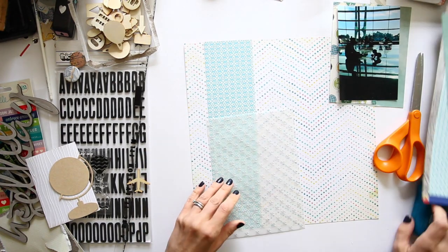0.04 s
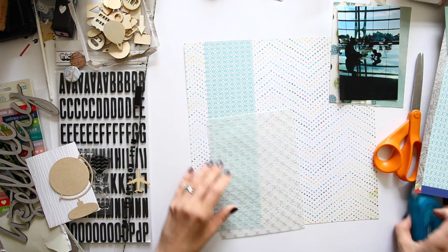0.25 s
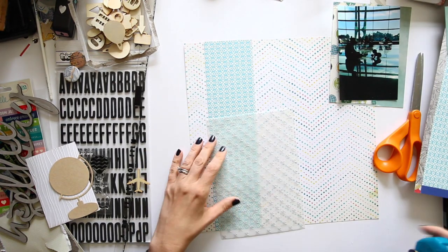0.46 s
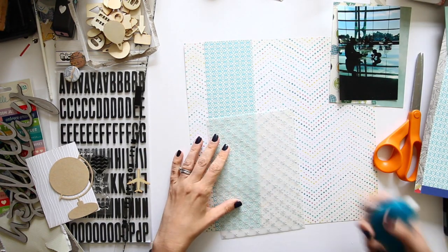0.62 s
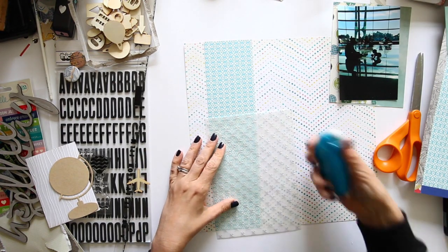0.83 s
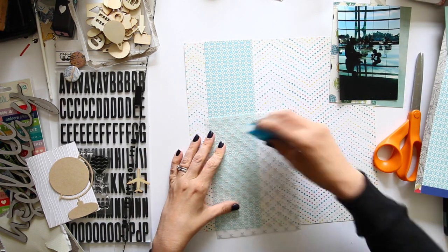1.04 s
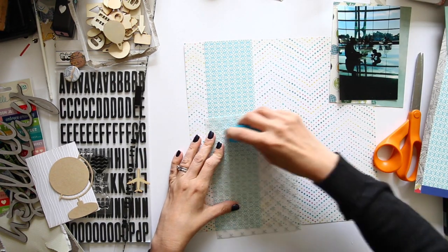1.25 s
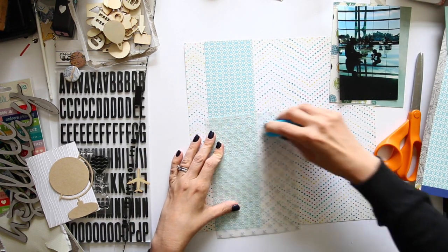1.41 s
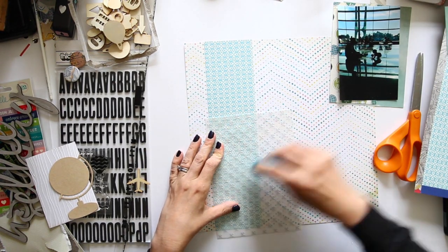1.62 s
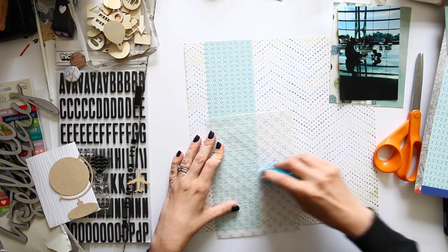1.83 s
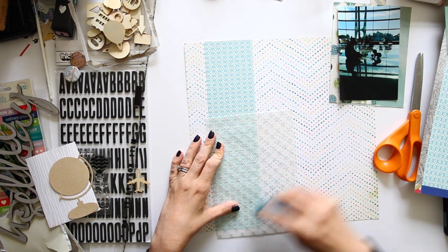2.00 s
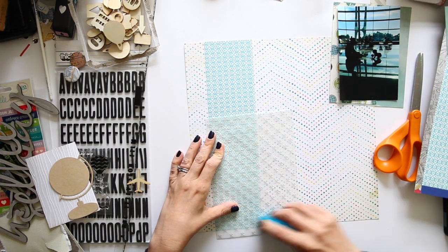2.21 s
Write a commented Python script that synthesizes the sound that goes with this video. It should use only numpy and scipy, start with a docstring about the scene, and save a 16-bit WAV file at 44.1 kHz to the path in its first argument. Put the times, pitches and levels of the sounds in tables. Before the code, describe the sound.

A hand-held glue-tape roller makes three fast, ratcheting rasps on paper, after soft hand rustles, a brief sheet drag and a hard plastic clack; close microphone, small dry room, faint hum and hiss.

```python
"""Glue-tape roller at a craft table

Hands and paper rustle, a sheet is dragged, then a hand-held roller is set down and drawn along paper three times.
Its ratchet ticks once per tooth (shaped noise bursts), faster in mid-stroke, and sticky tape snaps as random grains.
Knocks ring the modes of the hollow plastic shell, and soft pushes thud in the modes of the table.
A small dry room adds a short noise tail to the roller; a quiet hum and hiss of coloured noise lies under it all.
"""
import sys
import numpy as np
from scipy import signal
from scipy.fft import rfft, irfft
from scipy.io import wavfile

SR = 44100
rng = np.random.default_rng(int(sys.argv[2]) if len(sys.argv) > 2 else 0)


def put_to_file(sound):
    """Save the sound as 16-bit audio at rate SR, in the file named by the first command-line argument."""
    columns = np.atleast_2d(sound).T  # one column per channel
    safe = np.clip(columns, -1, 1)
    whole_steps = np.round(safe * 32767)
    wavfile.write(sys.argv[1], SR, whole_steps.astype(np.int16))


N = 99710

# Ringing modes of the hollow plastic shell. Each row: pitch in Hz, relative level in dB, T60 in s.
SHELL_MODES = [(778, -27, 0.064), (896, -4, 0.018), (1014, 5, 0.013), (1190, -6, 0.0088),
               (1370, -2.5, 0.017), (1518, 2, 0.015), (1765, 2.5, 0.011), (1870, -1, 0.022),
               (2065, -8, 0.057), (2570, -2.5, 0.0067), (3084, 1.5, 0.02), (4160, 5.5, 0.0068),
               (4900, 4.5, 0.0084)]
# Ringing modes of the table top. Each row: pitch in Hz, relative level in dB, T60 in s.
TABLE_MODES = [(133, -10, 0.08), (209.5, -7.5, 0.13), (251, -4, 0.065), (329, 0.5, 0.025), (394, -1, .04),
               (500, -24, 0.014)]
# Bright colour of cracking hard plastic, also worn by the tape. Each row: frequency in Hz, relative dB per Hz.
CRACK_COLOUR = [(1000, -22), (2500, -14), (3200, -6.5), (4200, -10), (6000, -5), (7500, -3), (8800, -5.5),
                (10500, -7.5), (13000, -14.5), (16000, -14)]


def amp(db):
    """Turn dB into a linear gain."""
    return 10 ** (np.asarray(db) / 20)


def rms_one(x):
    """Scale x to an rms of 1."""
    return x / np.sqrt(np.mean(x ** 2) + 1e-20)


def level(rows):
    """Draw a gain curve through (s, dB) rows, silent outside them."""
    s, db = np.transpose(rows)
    return amp(np.interp(np.arange(N) / SR, s, db, left=-150, right=-150))


def high_pass(x, hz):
    """Thin out everything below hz."""
    return signal.sosfilt(signal.butter(2, hz, "high", fs=SR, output="sos"), x)


def grains(per_s, spread_db):
    """Scatter tiny random snaps of uneven size."""
    happens = rng.random(N) < per_s / SR
    size = amp(spread_db * np.minimum(rng.exponential(1, N), 4))
    return happens * size * rng.standard_normal(N)


def coloured(x, spectrum):
    """Shape x with a spectrum of (Hz, dB) rows and bring it to an rms of 1."""
    hz, db = np.transpose(spectrum)
    f = np.maximum(np.arange(N // 2 + 1) * SR / N, 1)
    gain = amp(np.interp(np.log(f), np.log(hz), db))
    return rms_one(irfft(rfft(x) * gain, N))


def ring(x, hz, t60):
    """Excite one decaying mode, a two-pole resonator that is deaf to slow pushes."""
    r = amp(-60 / (t60 * SR))
    w = 2 * np.pi * hz / SR
    return signal.lfilter([1, 0, -1], [1, -2 * r * np.cos(w), r * r], x + 1e-18)


def ringing_body(x, modes):
    """Feed a steady sound through all the modes of a body; rms 1."""
    return rms_one(sum(amp(db) * rms_one(ring(x, hz, t60)) for hz, db, t60 in modes))


def bursts(count, t60):
    """Make short dying noise bursts, one a row."""
    return rng.standard_normal((count, 4096)) * amp(-60 * np.arange(4096) / SR / t60)


def lay(s, db, rows):
    """Place each row at its time, scaled to its peak level."""
    rows = rows * (amp(db) / np.abs(rows).max(axis=1))[:, None]
    out = np.zeros(N + SR)
    np.add.at(out, (s * SR).astype(int)[:, None] + np.arange(rows.shape[1]), rows)
    return out[:N]


def strike(touch, modes, spot_hz):
    """Let each blow drive the modes unevenly, most those near the pitch of the spot it hits."""
    mode_scatter_db, spot_db_per_octave, spot_floor_db = 3, 26, -14
    scatter = mode_scatter_db * rng.standard_normal((len(touch), len(modes)))
    out = 0
    for k, (hz, db, t60) in enumerate(modes):
        rung = ring(touch, hz, t60)
        octaves_off = np.abs(np.log2(hz / spot_hz))
        reach_db = np.maximum(-spot_db_per_octave * octaves_off, spot_floor_db)
        gain = amp(db + scatter[:, k] + reach_db) / np.abs(rung).max(axis=1)
        out = out + rung * gain[:, None]
    return out


def cracks(tilt_db, t60, rise_s, boost_db, boost_hz):
    """Make bright dying noise bursts of hard plastic, each favouring some parts of the colour."""
    patchy_db, tilt_from_hz, boost_width_octaves = 2.5, 6600, 0.18
    hz, db = np.transpose(CRACK_COLOUR)
    log_f = np.log(np.arange(1, 2050) * SR / 4096)
    patches = patchy_db * rng.standard_normal((len(tilt_db), len(hz)))
    patches = patches + tilt_db[:, None] * np.maximum(np.log2(hz / tilt_from_hz), 0)
    octaves_off = (log_f - np.log(boost_hz)[:, None]) / np.log(2)
    bump = boost_db * np.exp(-.5 * (octaves_off / boost_width_octaves) ** 2)
    colour = amp([np.interp(log_f, np.log(hz), db + p) for p in patches] + bump)
    t = np.arange(4096) / SR
    noise = irfft(rfft(rng.standard_normal((len(tilt_db), 4096))) * colour)
    return noise * amp(-60 * t / t60) * (1 - np.exp(-t / rise_s))


def hum_and_hiss():
    """Steady noise under the scene, its low end swollen into a hum."""
    # Each row: frequency in Hz, relative dB per Hz.
    floor_colour = [(12, -48), (20, 5), (74, -7.5), (142, 1), (357, -11), (399, -13.5), (678, -13),
                    (825, -11), (1000, -16), (1440, -14), (8650, -16), (11800, -20.5), (16000, -24)]
    floor_db = -62.5  # rms
    return amp(floor_db) * coloured(rng.standard_normal(N), floor_colour)


def rustle():
    """Skin and paper slide: dense fine friction grains that swell and fade."""
    # Each row: time in seconds, level in dB.
    rustle_level = [(0, -41), (.12, -45), (.208, -57), (.224, -49.5), (.278, -39.5), (.308, -45),
                    (.336, -37.5), (.396, -50), (.454, -52), (.494, -64.5), (.55, -65), (.575, -56),
                    (.595, -53.5), (.612, -59.5), (.65, -49.5), (.695, -55.5), (.712, -62), (.79, -58.5),
                    (.85, -54), (.885, -50), (.905, -51), (.92, -59), (.98, -57.5), (1.008, -49.5),
                    (1.03, -50), (1.055, -50), (1.075, -60), (1.1, -67), (1.14, -73)]
    # Each row: frequency in Hz, relative dB per Hz.
    rustle_colour = [(240, -36), (400, -9.5), (562, -17), (964, -8), (1110, -14), (2840, -6), (3210, -5),
                     (3810, -5), (7400, -1), (16000, -26.5)]
    return level(rustle_level) * coloured(grains(25000, spread_db=0.7), rustle_colour)


def knocks():
    """Shell ring and crack of each knock; the soft contact builds up briefly and chatters."""
    # Handling, landing and loose parts rattling. Each row: start in seconds, peak of the ring in dB,
    # peak of the crack in dB, tilt of the crack's top in dB per octave, most excited pitch in Hz.
    knock_rows = [(0.039, -28.5, -37, -1, 870), (0.054, -25, -36, -6, 1750),
                  (0.187, -33.5, -43.5, -15.5, 880), (0.5035, -40, -32.5, -23, 1860),
                  (0.593, -63, -41, -26, 3210), (0.778, -61, -40.5, 2, 3150), (0.785, -64, -39.5, 12, 2610),
                  (0.901, -38, -32.5, -7, 2030), (0.981, -42.5, -54, -13, 1970),
                  (1.005, -41.5, -32, -18, 2070), (1.051, -45.5, -39, 4, 2020), (1.073, -56, -43, -3, 2130),
                  (1.149, -34.5, -62, -21, 840), (1.181, -47, -58, -10, 1940), (1.196, -50, -63, -1, 1070),
                  (1.222, -35, -37, -20, 1980), (1.2246, -22, -12, -12, 1970),
                  (1.229, -22.5, -27, -17, 1950), (1.235, -31, -6, -7, 1930), (1.2357, -14, -10, -2, 1930),
                  (1.243, -24, -34, -8, 1800), (1.2868, -21, -35, -10, 940), (1.302, -54, -33, -10, 1310),
                  (1.3057, -16, -39, -4, 1270), (1.321, -22.5, -20, -16, 880), (1.338, -19, -28, -3, 1400),
                  (1.35, -29, -15, -24, 990), (1.367, -20, -44, 0, 1890), (1.433, -20, -30, -12, 1750),
                  (1.442, -21.5, -31, -2, 1030), (1.4928, -38, -27, -9, 3040), (1.7258, -38, -36, 2, 2400),
                  (1.73, -33.5, -32, -16, 3100), (1.7351, -19.5, -22, -28, 1720),
                  (1.739, -24.5, -18.5, -26, 1880), (1.8023, -21, -28, 3, 3300),
                  (1.845, -28, -16, -15, 2100), (1.8925, -25, -36, 1, 1830), (1.9038, -16, -12, -19, 1660),
                  (1.913, -25, -37, -10, 1680), (1.9338, -26, -16, -4, 1830), (2.1209, -31, -26, -1, 2950),
                  (2.124, -24.5, -29, -11, 2980), (2.128, -24, -16, -12.5, 3320),
                  (2.176, -30, -52, -13, 835), (2.22, -23, -18, 3, 895), (2.243, -24, -17, 13, 915),
                  (2.251, -20.5, -19, 10, 3040)]
    rise_s, touch_t60_s, crack_t60_s, soft_hz = 0.00041, 0.014, 0.0074, 4750
    s, ring_db, crack_db, tilt_db, spot_hz = np.transpose(knock_rows)
    build_up = 1 - np.exp(-np.arange(4096) / SR / rise_s)
    touch = build_up * bursts(len(s), touch_t60_s)
    touch = signal.sosfilt(signal.butter(4, soft_hz, fs=SR, output="sos"), touch)
    shell = lay(s, ring_db, strike(touch, SHELL_MODES, spot_hz))
    # no boost: the pitch has no effect on the crack
    return shell + lay(s, crack_db, cracks(tilt_db, crack_t60_s, rise_s, 0, spot_hz))


def thuds():
    """The table top thuds: a soft 4 ms push into its modes."""
    # Each row: start in seconds, peak in dB.
    thud_rows = [(0.045, -44.5), (0.188, -44.5), (1.225, -28.5), (1.426, -44.5), (1.599, -35), (1.731, -36),
                 (1.893, -44), (2.1208, -33.5)]
    s, db = np.transpose(thud_rows)
    push = np.zeros((len(s), 8192))
    push[:, :180] = np.hanning(180)
    return lay(s, db, strike(push, TABLE_MODES, 200 + 0 * s))


def rubs():
    """Fingers rub with a faint narrow hum: noise through a doubled resonance, swelling and fading."""
    # Each row: start in seconds, length in seconds, pitch in Hz, level in dB.
    rub_rows = [(0.229, 0.062, 382, -56), (0.623, 0.083, 1910, -61), (2.039, 0.099, 614, -67)]
    t60_s = 0.029  # of each of the two resonators
    t = np.arange(N) / SR
    out = np.zeros(N)
    for s, length, hz, db in rub_rows:
        swell = np.sin(np.pi * np.clip((t - s) / length, 0, 1)) ** .5
        hum = ring(ring(rng.standard_normal(N), hz, t60_s), hz, t60_s)
        out = out + amp(db) * swell * rms_one(hum)
    return out


def drag():
    """A sheet is dragged sharply: friction grains of very uneven size."""
    # Each row: time in seconds, level in dB.
    drag_level = [(.3, -47), (.325, -36), (.34, -31.5), (.36, -35), (.38, -36.5), (.392, -32), (.4, -48),
                  (.42, -48)]
    # Each row: frequency in Hz, relative dB per Hz.
    drag_colour = [(880, -28), (1500, -24), (2190, -18.5), (2560, -3.5), (3660, -2.5), (5280, -0.5),
                   (6500, -12), (8000, -6), (16000, -70)]
    return level(drag_level) * coloured(grains(22000, spread_db=3.3), drag_colour)


def peel():
    """Dense adhesive snaps: bright in the air, duller through the shell, a rumble in the table."""
    # Tape peeling and rolling, one list a stroke. Each row: time in seconds, level in dB.
    strokes = [
        [(1.285, -67), (1.3, -65), (1.36, -38), (1.43, -46), (1.47, -54), (1.5, -64)],
        [(1.79, -59), (1.81, -45), (1.87, -47), (1.91, -38.5), (1.935, -52.5), (1.95, -58)],
        [(2.165, -59), (2.2, -61), (2.23, -47), (2.26, -51)],
    ]
    body_db, rumble_db = 4, -16  # against the snaps in the air
    snaps = grains(3000, spread_db=1.0)
    pressure = sum(level(stroke) for stroke in strokes)
    tape = coloured(snaps, CRACK_COLOUR) + amp(body_db) * ringing_body(snaps, SHELL_MODES)
    rumble = amp(rumble_db) * ringing_body(snaps, TABLE_MODES)
    return pressure * tape, pressure * rumble


def pawl():
    """Ratchet teeth slip past the pawl: thin hard ticks with a little shell ring."""
    # Each row: start in seconds, peak of the tick in dB.
    teeth = [(1.2877, -17), (1.2994, -13), (1.3036, -20), (1.3103, -17), (1.319, -14), (1.3266, -18),
             (1.334, -21), (1.3406, -21), (1.3483, -20), (1.3545, -22), (1.3616, -17), (1.3673, -19),
             (1.3727, -19), (1.3788, -20), (1.3847, -19), (1.3911, -21), (1.3963, -17), (1.4005, -20),
             (1.4072, -19), (1.4114, -17), (1.4175, -15), (1.4232, -17), (1.4292, -14), (1.4355, -17),
             (1.4425, -15), (1.4506, -16), (1.4592, -15), (1.4699, -17), (1.4807, -15), (1.4884, -29),
             (1.493, -19), (1.7915, -16), (1.801, -22), (1.8055, -18), (1.815, -15), (1.8232, -17),
             (1.8315, -16), (1.8386, -17), (1.8462, -15), (1.8531, -15), (1.8602, -15), (1.8672, -16),
             (1.8741, -14), (1.8821, -15), (1.8898, -19), (1.8941, -26), (1.899, -18), (1.9041, -19),
             (1.9088, -19), (1.9179, -21), (1.9276, -18), (1.9322, -21), (2.1908, -19), (2.204, -14),
             (2.2144, -16), (2.2237, -14), (2.2311, -15), (2.2382, -15), (2.2446, -20), (2.2507, -18),
             (2.2566, -21)]
    # Where the ticks are brightest, as grip and angle change. Each row: time in seconds, pitch in Hz.
    tick_pitch = [(1.29, 8400), (1.35, 7150), (1.4, 8500), (1.44, 7300), (1.49, 7340), (1.79, 9100),
                  (1.86, 8400), (1.885, 8500), (1.93, 8400), (2.19, 10400), (2.26, 9700)]
    tick_t60_s, tick_rise_s, tick_boost_db = 0.014, 0.000095, 5.5
    touch_t60_s, body_db, spot_hz = 0.0078, -9.5, 3330  # shell ring, level against the tick
    s, db = np.transpose(teeth)
    body = strike(bursts(len(s), touch_t60_s), SHELL_MODES, spot_hz + 0 * s)
    bright_hz = np.interp(s, *np.transpose(tick_pitch))
    ticks = cracks(0 * s, tick_t60_s, tick_rise_s, tick_boost_db, bright_hz)
    return lay(s, db, ticks) + lay(s, db + body_db, body)


def brush():
    """A soft brush between the last strokes: fine, even friction grains."""
    # Each row: time in seconds, level in dB.
    brush_level = [(1.96, -56), (2.19, -55.5)]
    # Each row: frequency in Hz, relative dB per Hz.
    brush_colour = [(240, -60), (400, -18), (587, 7), (697, -12), (1760, 1), (2440, -3), (3380, 1),
                    (12000, -24), (15600, -73), (22000, -120)]
    return level(brush_level) * coloured(grains(28000, spread_db=0.0), brush_colour)


def room(x):
    """Add a quick diffuse tail of dying noise, slightly dull."""
    t60_s, tail_db, cut_hz = .16, -7.5, 7800
    t = np.arange(SR // 2) / SR
    noise = signal.lfilter(*signal.butter(1, cut_hz, fs=SR), rng.standard_normal(len(t)))
    tail = noise * amp(-60 * t / t60_s) * (t > .002)  # starts 2 ms after the direct sound
    tail = tail / np.sqrt(np.sum(tail ** 2))
    return x + amp(tail_db) * signal.fftconvolve(x, tail)[:N]


def scene():
    """Mix the roller in its room with table, paper, fingers and the steady floor."""
    shell_thin_hz, table_thin_hz = 722, 119  # bass cut of each body
    tape, rumble = peel()
    roller = room(high_pass(pawl() + knocks() + tape, shell_thin_hz))
    table = high_pass(thuds() + rumble, table_thin_hz)
    paper = rustle() + drag() + brush()
    return (roller + table + paper + rubs() + hum_and_hiss())[None]


def record(dry):
    """Thin the deepest bass and cut the top steeply."""
    bass_thin_hz, top_stop_hz = 40.6, 16400  # 70 dB down from top_stop_hz upward
    top_cut = signal.cheby2(14, 70, top_stop_hz, fs=SR, output="sos")
    return signal.sosfilt(top_cut, high_pass(dry, bass_thin_hz))


dry = scene()
out = record(dry)
put_to_file(out)
```